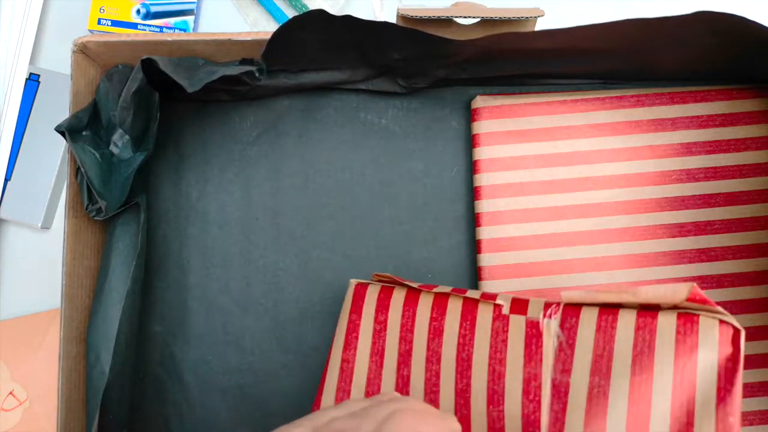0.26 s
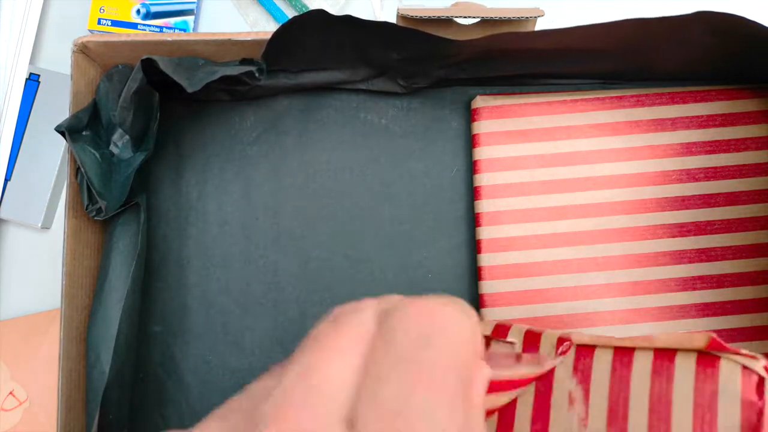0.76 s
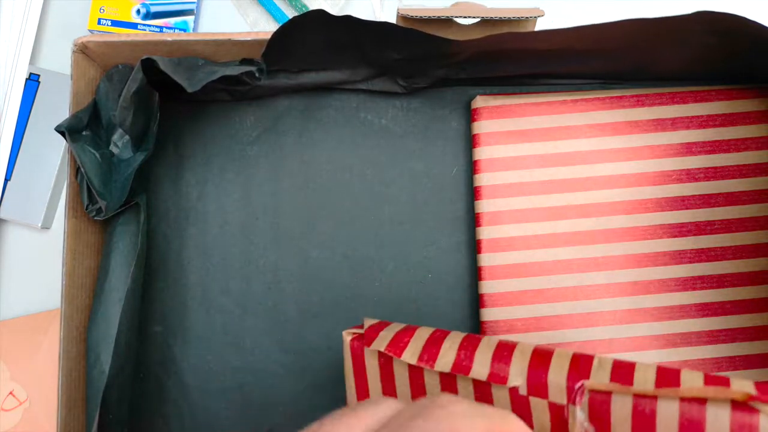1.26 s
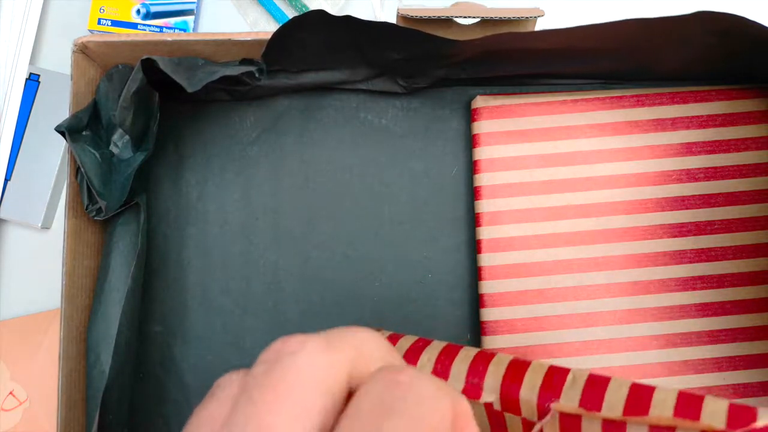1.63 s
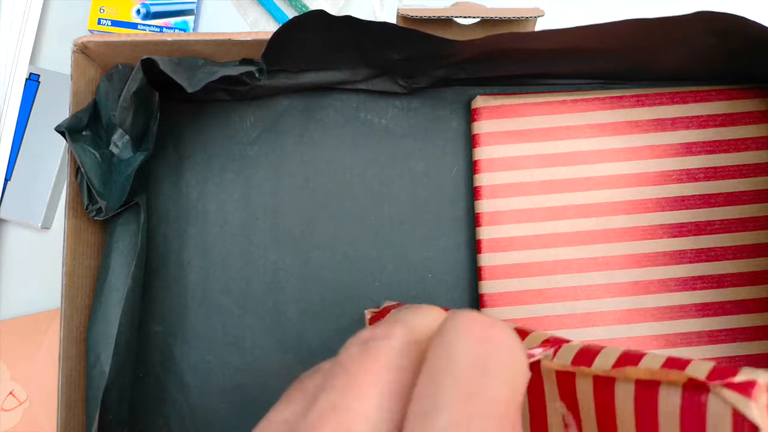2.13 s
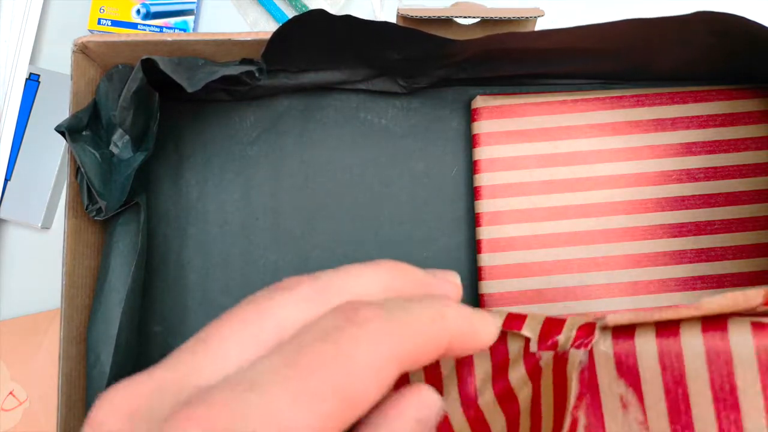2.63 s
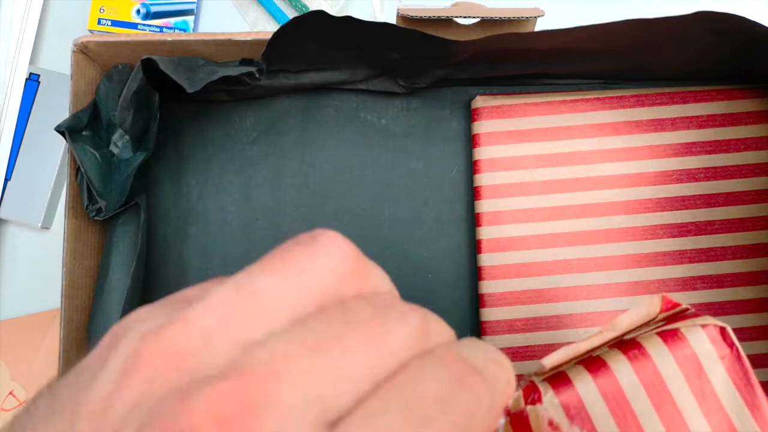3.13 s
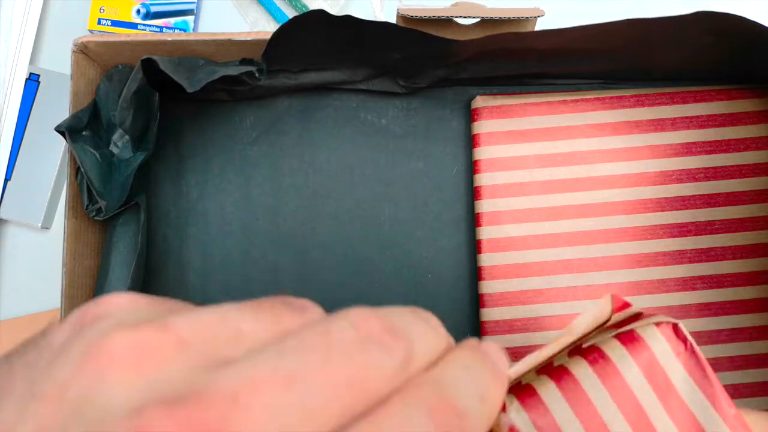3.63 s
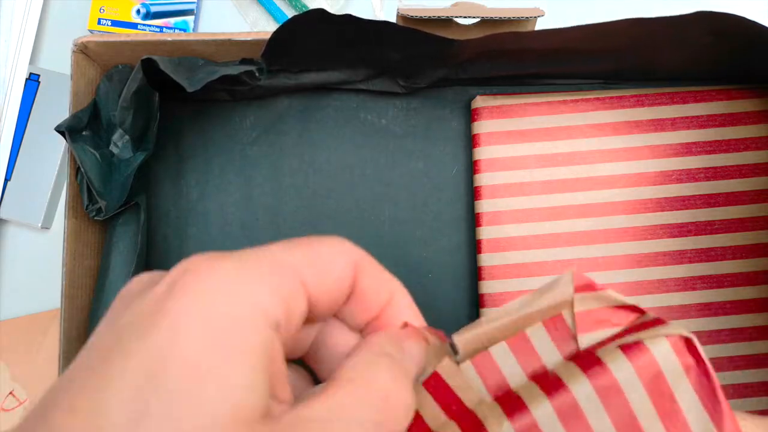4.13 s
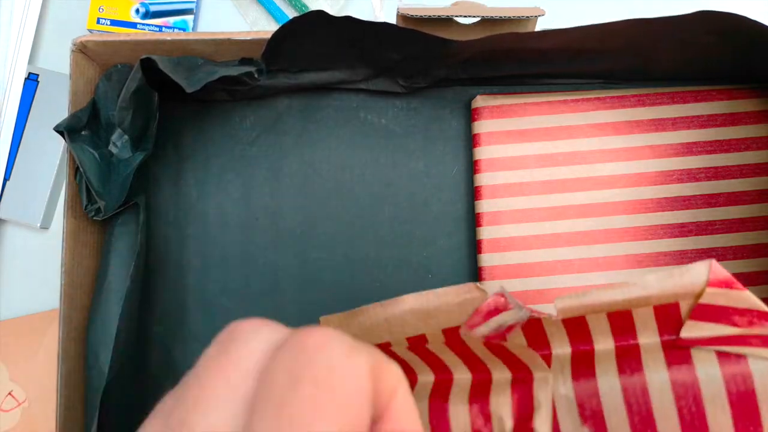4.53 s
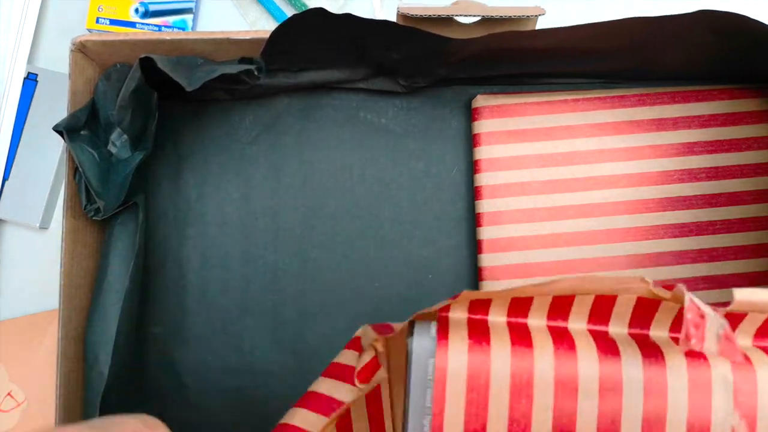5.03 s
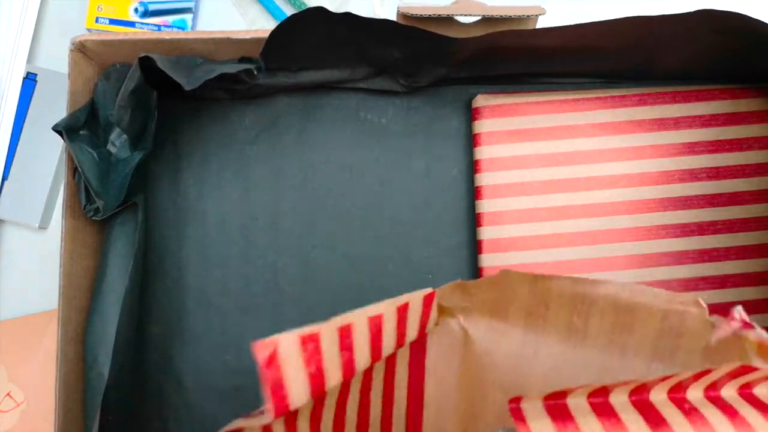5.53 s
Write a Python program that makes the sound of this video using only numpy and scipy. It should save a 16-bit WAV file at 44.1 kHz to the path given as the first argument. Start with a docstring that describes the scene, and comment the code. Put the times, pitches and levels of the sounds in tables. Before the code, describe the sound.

Crisp gift wrap rustles, clicks and tears right at the microphone. The opening handling is busy, then nearly stops around one and a half seconds before irregular snaps and crumples resume. From four and a half seconds, rougher pulls combine with dull low knocks of the parcel, easing at the end. The indoor space is small and quiet, with low hum, and snaps drift slightly from left to right.

```python
"""In a quiet, humming room, fingers pick at, tear and crumple stiff gift wrap over an open cardboard box.
Creases snap as clicks that ring down; fibres crackle as scattered tiny pops and tear as fluttering noise.
The parcel rumbles as lumpy low noise, jolts as short swings, and one faint tone wavers.
Sparse echoes stand for carton and room; a close two-port microphone hears it all."""
import sys
import numpy as np
from scipy import signal
from scipy.fft import rfft, irfft, next_fast_len
from scipy.io import wavfile
from scipy.ndimage import uniform_filter1d

SR = 44100
rng = np.random.default_rng(int(sys.argv[2]) if len(sys.argv) > 2 else 0)


def file_out(sig):
    """Save sig as 16-bit WAV at sys.argv[1]."""
    # one column per channel
    cols = np.atleast_2d(sig).T
    # limit, then scale
    lim = np.clip(cols, -1, 1)
    pcm = np.round(lim * 32767).astype(np.int16)
    wavfile.write(sys.argv[1], SR, pcm)


N = 254456


def gain_of(db):
    """Level: 20 dB is a tenfold amplitude."""
    return 10 ** (np.asarray(db) / 20)


def evened(x):
    """Power: scales a signal to rms 1."""
    return x / np.sqrt(np.mean(x ** 2) + 1e-20)


def lumpy(first, second):
    """Modulation: noise averaged over two spans (samples) wanders slowly, at rms 1."""
    return evened(uniform_filter1d(uniform_filter1d(rng.standard_normal(N), first), second))


def read(points, hz):
    """Log-frequency scale: interpolates a spectrum table between its points."""
    f, value = np.transpose(points)
    return np.interp(np.log(hz + 1), np.log(f + 1), value)


def add(mix, s, sound):
    """Superposition: mixes a sound in at time s."""
    part = mix[..., round(s * SR):][..., :sound.shape[-1]]
    part += sound[..., :part.shape[-1]]


def colour(x, taps):
    """Linear filtering of both channels that keeps the power of white noise."""
    return signal.oaconvolve(x, taps / np.linalg.norm(taps), axes=1)[:, :N]


def split(x, hz):
    """Crossover: the parts below and above hz add up flat in power."""
    low = signal.butter(3, hz, "low", fs=SR, output="sos")
    high = signal.butter(3, hz, "high", fs=SR, output="sos")
    return signal.sosfilt(low, x), signal.sosfilt(high, x)


def panned(db):
    """Level difference: gains of the left and right channel, db apart."""
    return gain_of([db / 2, -db / 2])


def ringing(points):
    """Minimum phase: a causal response with a table's dB shape, so clicks keep their sharp start."""
    level_db = np.maximum(read(points, abs(np.fft.fftfreq(8192, 1 / SR))), -90)
    log_gain = np.log(gain_of(level_db))
    phase = -signal.hilbert(log_gain).imag
    return np.fft.ifft(np.exp(log_gain + 1j * phase)).real[None, :4096]


def burst(t60, noise, tick=10.5):
    """Modal density: a buckling patch ticks, then rings in countless modes as dying noise of energy 1."""
    ring = noise * gain_of(-60 * np.arange(noise.shape[-1]) / SR / t60)
    ring[:, 0] = tick * np.sign(ring[:, 0])
    return ring / np.linalg.norm(ring, axis=1, keepdims=True)


def ranges(force):
    """Forced response: one force for all, or one each, drives the sheet's body, middle and edge ranges."""
    # spectral shape of sheet and microphone together: pitch_hz, density_db (per Hz)
    sheet_shape = [(88, -38), (150, -11), (350, -9), (545, -18), (757, -6), (1200, -3), (1350, 1.5),
                   (1490, -3.5), (1600, 2), (2700, 4.5), (4210, -2.5), (7080, 3.5), (9270, -3.5),
                   (10200, -12), (15000, -23)]
    body, rest = split(ringing(sheet_shape), 2070)
    middle, edge = split(rest, 5430)
    force = np.broadcast_to(force, (3, 2, N))
    return np.array([colour(part, taps) for part, taps in zip(force, (body, middle, edge))])


def room_hum():
    """Stationary noise: the room's steady low sound has a fixed spectrum."""
    # spectral shape of the room: pitch_hz, density_db (per Hz)
    room_shape = [(18, -18), (30, -18.5), (55, -14.5), (76, -28), (167, -15.5), (190, -38), (288, -53),
                  (1870, -36.5), (15000, -68)]
    level_db = -65.5
    return gain_of(level_db) * evened(colour(rng.standard_normal((2, N)), ringing(room_shape)))


def parcel_rumble():
    """Turbulence and vibration: parcel and box move air and shake the stand, making lumpy low noise."""
    # rumble while the parcel moves: time_s, level_db
    shaking = [(0.0, -49.5), (0.21, -63), (0.45, -53.5), (0.69, -49.5), (0.95, -59), (1.53, -68.5),
               (2.71, -62), (3.66, -60.5), (3.82, -54), (4.37, -56), (4.5, -51.5), (4.769, -45.5),
               (5.01, -59), (5.269, -46.5), (5.46, -46.5), (5.77, -54)]
    # its spectral shape: pitch_hz, density_db (per Hz)
    rumble_shape = [(13, -38.5), (22, -2.5), (75, -3), (119, -2), (180, -13.5), (300, -16.5), (430, -18),
                    (600, -48.5)]
    lump_db = 4.5
    force = rng.standard_normal((2, N)) * gain_of(lump_db * lumpy(1300, 1000))
    s, level_db = np.transpose(shaking)
    return evened(colour(force, ringing(rumble_shape))) * gain_of(np.interp(np.arange(N) / SR, s, level_db))


def rustle(fits_db=3.0):
    """Intermittent friction: power of the held sheet's faint rustle, in fits and starts, by range."""
    # rustle of the held sheet: time_s, level_db
    handling = [(0.0, -39.5), (0.67, -37), (1.11, -59), (1.301, -78), (1.56, -77), (1.74, -52),
                (2.62, -39.5), (3.04, -48), (3.38, -41.5), (3.52, -58), (3.6, -41), (3.81, -44),
                (4.0, -43.5), (4.16, -47.5), (4.4, -45), (4.85, -39.5), (5.48, -41), (5.77, -48)]
    # offsets of the body, middle and edge ranges: level_db
    range_db = [
        [-6.0],
        [-3.0],
        [-10],
    ]
    s, sheet_db = np.transpose(handling)
    level_db = np.interp(np.arange(N) / SR, s, sheet_db) + fits_db * lumpy(800, 600)
    return gain_of(2 * (level_db + range_db))  # doubled dB give power


def crackle(per_s=900, spread_db=4.5, hiss=0.61, pop_flutter_db=-0.06, plain=0.38, count=16):
    """Shot noise: scattered tiny pops of many sizes and pitches over the hiss of fibres and skin."""
    flutter = lumpy(150, 110)
    size = gain_of(spread_db * np.minimum(rng.exponential(1, N), 4)) * (rng.random(N) < per_s / SR)
    patch, pops = rng.integers(0, count, N), np.zeros((2, N))
    for k, hz in enumerate(np.geomspace(500, 13000, count)):  # small patches ring high and short
        ring = burst(0.03 * (500 / hz) ** 0.043, rng.standard_normal((2, 1400)), tick=0.66)
        band = signal.butter(1, [0.47 * hz, 1.67 * hz], "band", fs=SR, output="sos")
        ring = plain * ring + signal.sosfilt(band, ring) * (4000 / hz) ** 0.55
        pops += signal.oaconvolve((size * (patch == k))[None], ring, axes=1)[:, :N]
    noise = rng.standard_normal((2, N))
    grains = (evened(pops) + hiss * noise) * gain_of(pop_flutter_db * flutter)  # all but steady
    tear = noise * gain_of(2.45 * flutter)
    grains = np.array([evened(part) for part in ranges(grains)])
    tear = np.array([evened(part) for part in ranges(tear)])
    stroke_power, tearing = strokes()
    level = np.sqrt(rustle() + stroke_power)[:, None]
    return level * (np.sqrt(1 - tearing) * grains + np.sqrt(tearing) * tear)


def patchy(x, patch_db=2.5):
    """Time-varying filtering: folds open and close, so patches of the spectrum swell and fade."""
    z = signal.stft(x, nperseg=256, noverlap=192)[2]
    field = rng.standard_normal(z.shape[1:])
    for size, axis in ((7, 0), (5, 0), (22, 1), (14, 1)):  # axis 0 is pitch, axis 1 is time
        field = uniform_filter1d(field, size, axis)
    return signal.istft(z * gain_of(patch_db * evened(field)), nperseg=256, noverlap=192)[1][:, :N]


def snaps(t60=0.038, pitched=0.26, boxy=0.85):
    """Snap-through buckling: each crease ticks and rings in three ranges, middle longest, edge shortest."""
    # creases that pop: start_s, level_db (middle range's energy as rms over 3 ms, before panning),
    # brightness_db (small creases are bright, large ones dull)
    creases = [(0.0394, -30.5, -2), (0.061, -19.5, 7.5), (0.1174, -22, -3.5), (0.1971, -33, 23),
               (0.2104, -27, 29), (0.2542, -25, -4), (0.342, -22, 10), (0.43, -22, 0), (0.5048, -28, -4),
               (0.5105, -30.5, 4), (0.558, -36, 30), (0.581, -33, 23), (0.6328, -36.5, 41),
               (0.7312, -21.5, -19), (0.7566, -19.5, -10.5), (0.8508, -31, 17), (0.895, -27, -8),
               (0.9723, -35, 11.5), (1.022, -30.5, -17), (1.0322, -20, -18), (1.0956, -46.5, -42.5),
               (1.123, -43, -4), (1.1371, -35.5, -21), (1.1922, -33.5, 1), (1.229, -32, -2.5),
               (1.2479, -28, -11), (1.354, -61, -29), (1.6366, -37.5, 5.5), (1.6839, -25, -4),
               (1.851, -34, -30), (1.8837, -33, 2), (1.953, -37, 2), (2.036, -33.5, -3),
               (2.221, -29.5, -11.5), (2.243, -33, -14), (2.2658, -30.5, -13), (2.2778, -19.5, -15.5),
               (2.286, -29, 19), (2.4264, -16.5, -0.5), (2.4801, -23, -15), (2.5438, -19.5, 12.5),
               (2.6871, -21, 2.5), (2.714, -17, 3), (2.8344, -18, 9), (2.8429, -28.5, 12),
               (2.9652, -32, -10), (3.0405, -44, -12), (3.056, -34, 6), (3.092, -46, 22), (3.2479, -39, 35),
               (3.2635, -27.5, -13), (3.326, -37.5, -21), (3.3414, -19, 15), (3.37, -38, 14),
               (3.5608, -25.5, 16.5), (3.578, -28.5, -18), (3.6055, -27, -1), (3.6289, -31.5, -16),
               (3.66, -40, 21), (3.7367, -28.5, -14), (3.8018, -26.5, -7), (3.8378, -25, 3),
               (3.8443, -22, -2), (3.9192, -26.5, 7), (3.957, -32, -5), (3.9674, -19.5, 16),
               (3.9832, -14, 17), (3.985, -22, 8.5), (4.0657, -26.5, 12), (4.08, -34.5, 21.5),
               (4.122, -23, -11), (4.131, -18, 0.5), (4.142, -22.5, 6), (4.2686, -43, -35),
               (4.2935, -32.5, -15), (4.3235, -29, -9), (4.3979, -26, 2), (4.5793, -17, -6),
               (4.6153, -34, 11), (4.6447, -25, -5.5), (4.685, -40.5, 12), (4.712, -40, -22),
               (4.757, -32, -17), (4.775, -28, -17), (4.7951, -26, 17), (4.8641, -16.5, -3.5),
               (4.892, -25.5, 2), (4.9491, -24, -7), (4.9735, -28.5, -5), (5.0005, -17, 10),
               (5.0159, -18, 1), (5.101, -29.5, -28.5), (5.257, -17.5, 16.5), (5.4132, -37.5, -40),
               (5.453, -37, -3), (5.475, -31, -17), (5.516, -41.5, 19), (5.636, -36, -30)]
    body_db, edge_db = -8, -6.5  # re the middle, at brightness 0
    pan_start_db, pan_end_db, pan_scatter_db = 3, -4, -7.5  # the work drifts from left port to right
    lag_s = .0001  # a tick reaches one port up to this much before the other
    out, noise = np.zeros((3, 2, N)), rng.standard_normal((len(creases), 2, 2400))
    for (s, db, bright_db), z, (a, b, c, d) in zip(creases, noise, rng.random((len(creases), 4))):
        z = z * np.sign(z[:, :1])  # both ports get the same push
        middle, body, edge = burst(t60, z), burst(0.89 * t60, z, tick=2.05), burst(0.63 * t60, z)
        body = body + boxy * signal.lfilter(*signal.iirpeak(850 + 900 * c, 7.0, SR), body)
        # each crease favours a pitch, higher when bright
        pitch_hz = np.clip(4200 * 2 ** (bright_db / 24 + 0.83 * (a - .5)), 2200, 7500)
        middle = middle + pitched * signal.lfilter(*signal.iirpeak(pitch_hz, 4.0, SR), middle)
        pan_db = np.interp(s * SR, [0, N], [pan_start_db, pan_end_db]) + pan_scatter_db * (2 * b - 1)
        side = panned(pan_db)[:, None]
        pop = np.array([
            gain_of(body_db - bright_db / 2) * body / np.linalg.norm(body[0]),  # long waves: no panning
            side * middle / np.linalg.norm(middle[0]),
            side * gain_of(edge_db + bright_db / 2) * edge])
        pop *= gain_of(db) * np.sqrt(.003 * SR)
        add(out[:, 0], s, pop[:, 0])
        add(out[:, 1], s + lag_s * (2 * d - 1), pop[:, 1])
    return out


def box(x):
    """Reverberation: sparse echoes of random sign in carton and room, each band dying at its own speed."""
    # echo decay: pitch_hz, t60_s
    decay = [(500, 0.077), (2000, 0.35), (6000, 0.24), (14000, 0.11)]
    taps = np.zeros((2, 8192))
    at = np.arange(60, 8160, 20) + rng.integers(0, 20, (2, 405))
    np.put_along_axis(taps, at, rng.choice([-1., 1.], at.shape), 1)
    hz, t, z = signal.stft(taps, SR, nperseg=64)
    tail = signal.istft(z * gain_of(-60 * t / read(decay, hz)[:, None]), SR, nperseg=64)[1]
    return signal.oaconvolve(x, tail / np.linalg.norm(tail[0]), axes=1)[:, :N]


def strokes():
    """Fracture and friction: range powers of tears, drags and crushes, and the share of tearing noise."""
    # paper torn, dragged or crushed: start_s, length_s, level_db (middle range after the attack), brightness_db
    pulls = [(0.209, 0.14, -28, 13), (0.503, 0.098, -34.5, -4), (0.606, 0.15, -46.5, 33),
             (0.673, 0.1, -23, 12.5), (0.822, 0.053, -34, -5), (0.952, 0.022, -37.5, -15),
             (1.169, 0.11, -38.5, -3.5), (1.498, 0.071, -58.5, -2), (1.561, 0.1, -49, -8),
             (1.66, 0.11, -41.5, -2.5), (1.764, 0.052, -39, -6), (1.945, 0.056, -45, 11.5),
             (2.042, 0.047, -35, -5), (2.16, 0.0096, -35, 8), (2.254, 0.049, -39, 1),
             (2.395, 0.061, -34.5, 8), (2.489, 0.12, -32, -6.5), (2.775, 0.055, -33, -2.5),
             (3.028, 0.018, -62, 12), (3.131, 0.055, -40, -9), (3.331, 0.14, -48, 14.5),
             (3.557, 0.047, -44.5, -10), (3.826, 0.11, -32.5, 4.5), (3.947, 0.07, -28, -2),
             (4.044, 0.052, -38, -9), (4.104, 0.079, -33.5, 3), (4.31, 0.099, -35, 1.5),
             (4.42, 0.047, -31, 4.5), (4.535, 0.045, -33.5, -3.5), (4.726, 0.18, -27, -8),
             (4.96, 0.077, -30, 3.5), (5.066, 0.021, -34, -12), (5.212, 0.11, -26, -2),
             (5.381, 0.019, -42, -3), (5.47, 0.021, -34.5, -29), (5.631, 0.028, -30, -6),
             (5.712, 0.011, -38, -9)]
    body_db, edge_db = -4.5, -6  # re the middle, at brightness 0
    attack_s, release_s = 0.012, 0.041
    crush_fade_db, tear_fade_db = -6.5, -2  # a crush dies away more than a tear
    tear_from_db, tear_span_db = -3.5, 17  # brightness over which crackle turns into tearing noise
    power, tearing = np.zeros((3, N)), np.zeros(N)
    for s, length, db, bright_db in pulls:
        tear = np.clip((bright_db - tear_from_db) / tear_span_db, 0, 1)  # parting fibres move little sheet
        end_db = db + tear * tear_fade_db + (1 - tear) * crush_fade_db
        u = np.arange(0, length + release_s, 1 / SR)
        shape = gain_of(np.interp(u, [0, attack_s, length, length + release_s],
                                  [db - 16.5, db, end_db, end_db - 45]))
        range_gain = gain_of([[body_db - bright_db / 2], [0], [edge_db + bright_db / 2]])
        add(power, s, (range_gain * shape) ** 2)
        add(tearing, s, tear * np.ones(len(u)))
    return power, np.clip(tearing, 0, .9)


def jolts():
    """Impulse response: each knock of the parcel is a short swing under a bell-shaped envelope."""
    # jolts and knocks: centre_s, level_db (of the envelope's peak), pitch_hz
    knocks = [(0.565, -39.5, 363), (1.034, -38, 373), (1.239, -37.5, 88), (1.855, -35.5, 231),
              (2.041, -38, 310), (2.102, -47, 175), (2.28, -33, 260), (2.483, -31.5, 244), (2.541, -38, 90),
              (2.587, -41, 214), (3.328, -45.5, 252), (3.982, -30, 363), (3.988, -29, 90),
              (4.3, -38.5, 107), (4.668, -39, 81), (4.772, -32, 290), (4.777, -27, 116), (4.834, -33.5, 91),
              (4.836, -36.5, 404), (5.285, -40, 242), (5.331, -30, 95), (5.404, -28, 66),
              (5.479, -44.5, 222), (5.581, -32.5, 69.4), (5.657, -41.5, 398), (5.731, -37.5, 73.5)]
    lag = 0.16  # the right port meets a knock later (turns)
    out = np.zeros((2, N))
    for (s, db, hz), start in zip(knocks, rng.random((len(knocks), 1, 1)) - [[0], [lag]]):
        turns = np.arange(-3, 3, hz / SR)
        width = 0.53 * (hz / 80) ** .5  # higher knocks swing more times
        swing = np.exp(-(turns / width) ** 2) * np.sin(2 * np.pi * (turns + start))
        add(out, s - 3 / hz, gain_of(db) * swing)
    return out


def squeak():
    """Phase modulation: one faint wavering tone, perhaps rubbing."""
    # the tone: start_s, end_s, pitch_hz, level_db (rms before the fades)
    start, end, hz, db = (2.87, 3.03, 450, -65)
    out = np.zeros((2, N))
    t = np.arange(0, end - start, 1 / SR)
    tone = np.sin(2 * np.pi * hz * t + lumpy(1300, 1000)[:len(t)])
    add(out, start, gain_of(db) * np.sqrt(2) * signal.windows.tukey(len(t), .4) * tone)
    return out


def paper():
    """Superposition of the sheet's patchy crackle and its snaps."""
    return patchy(crackle().sum(0)) + ranges(snaps()).sum(0)


def ports(x):
    """Coherence: two renderings become a pair whose likeness depends on frequency."""
    # left-right likeness: pitch_hz, likeness (0 to 1)
    likeness = [(60, 0.96), (130, 1), (300, 0.063), (1000, 0.86), (1700, 0.56), (2500, 0.02),
                (15000, 0.018)]
    size = next_fast_len(N)
    a, b = rfft(x, size)
    same = np.clip(read(likeness, np.fft.rfftfreq(size, 1 / SR)), -1, 1)
    return irfft(np.array([a, same * a + np.sqrt(1 - same ** 2) * b]), size)[:, :N]


def scene():
    """Superposition: paper, its echoes, parcel, squeak and room as the two ports meet them."""
    sheet = paper()
    echoes = gain_of(-18.5) * box(sheet)
    return ports(room_hum() + parcel_rumble() + sheet + echoes + jolts() + squeak())


def record(dry):
    """Transduction: each port has its own treble, peaks clip softly, and the band is limited."""
    # the left port has a bright peak, the right one is shaded: pitch_hz, left_minus_right_db
    port_treble = [(300, 1), (1500, 1.5), (2500, -2.5), (6000, -5), (7500, 1), (9300, 16), (13000, 15),
                   (15000, 8)]
    edge_hz = 15250
    size = next_fast_len(N)
    balance = panned(read(port_treble, np.fft.rfftfreq(size, 1 / SR)))
    wet = irfft(rfft(dry, size) * balance, size)[:, :N]
    wet = wet / (1 + abs(wet) ** 4) ** .25
    low_pass = signal.firwin(255, edge_hz, window=("kaiser", 10), fs=SR)
    return signal.oaconvolve(wet, low_pass[None], "same")


dry = scene()
out = record(dry)
file_out(out)
```